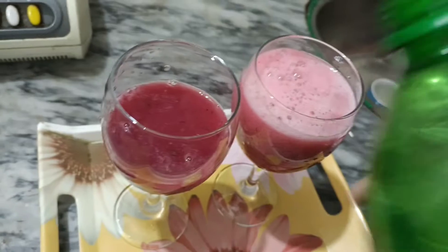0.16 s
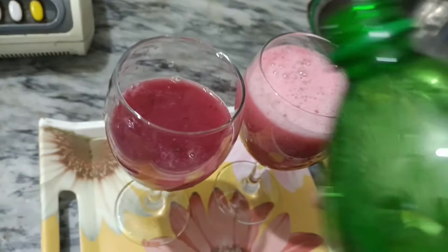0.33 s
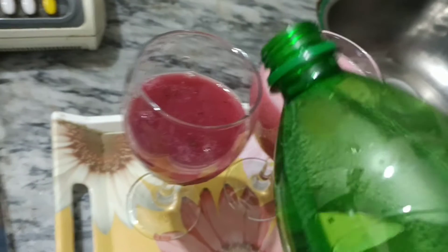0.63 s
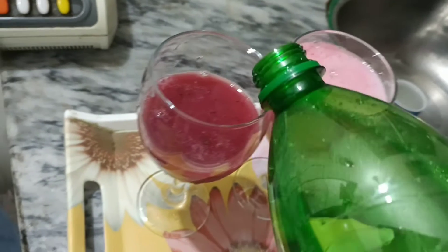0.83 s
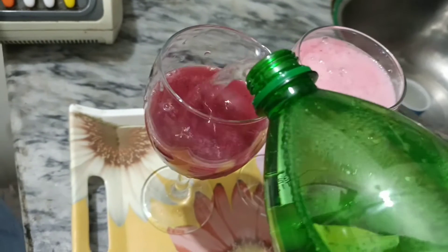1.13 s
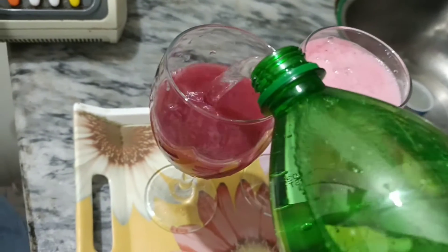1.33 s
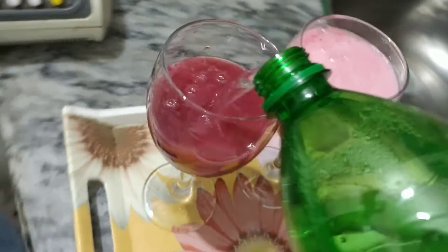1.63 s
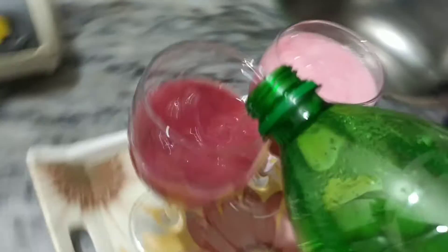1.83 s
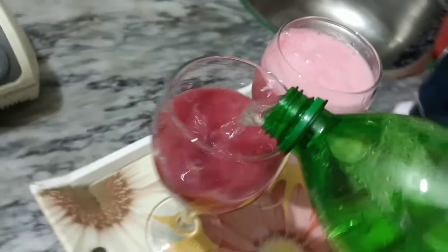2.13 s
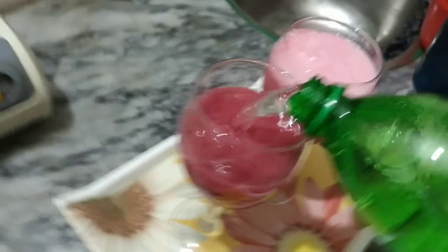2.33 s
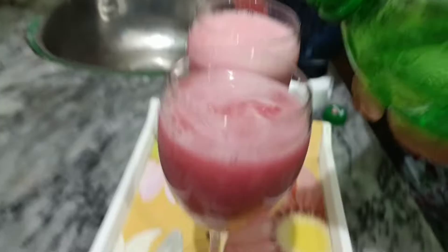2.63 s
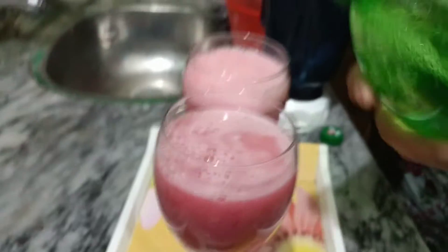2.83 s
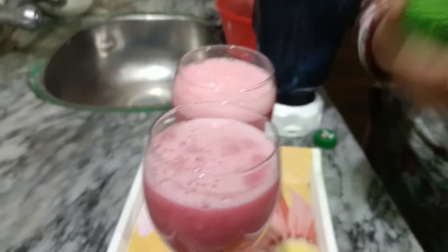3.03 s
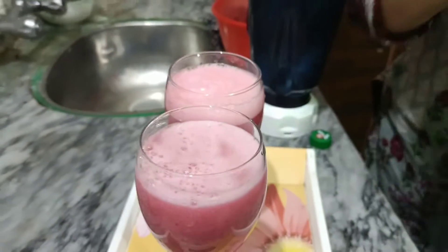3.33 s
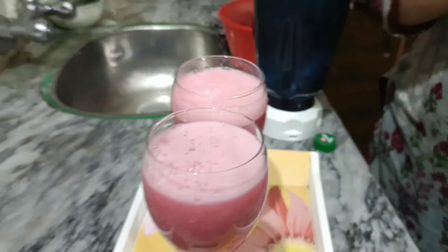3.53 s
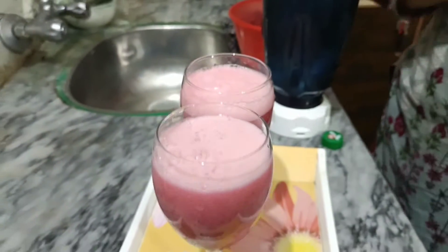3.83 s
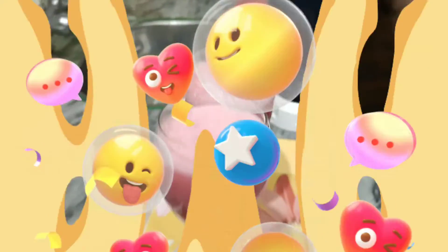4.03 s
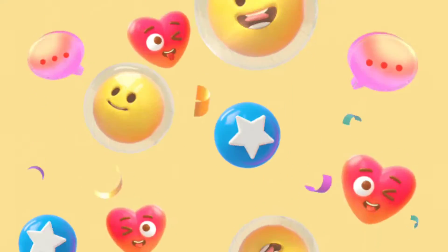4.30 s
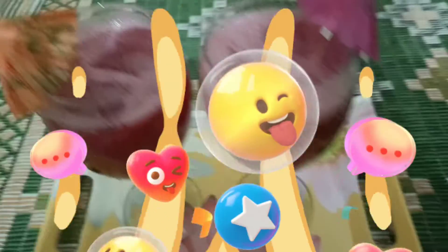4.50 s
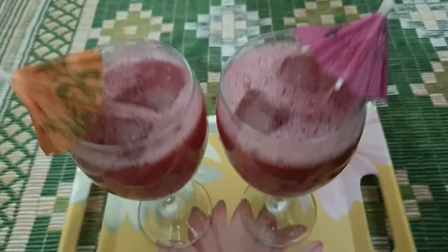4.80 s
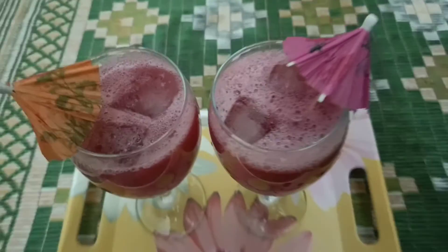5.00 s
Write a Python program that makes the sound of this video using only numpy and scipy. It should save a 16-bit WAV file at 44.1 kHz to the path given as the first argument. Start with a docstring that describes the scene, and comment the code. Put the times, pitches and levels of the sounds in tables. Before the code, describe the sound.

A large thin plastic bottle pops and crumples near the microphone as fizzy soda lands in a glass, gurgling faintly over steady hum and hiss. After pouring, fizz continues with scattered clicks and a harsh squeeze of plastic. Then a hard cut: low handling thuds, scuffing and small clicks in a different background, and finally an almost silent room.

```python
"""Soda poured into juice, in three shots

In a humming kitchen, soda from a big plastic bottle splashes and gulps into a glass of juice.
The thin wall snaps and crumples: cracks and creases ringing a panel. The fizz, filtered noise and clicks,
follows the stream of ringing air pockets; a faint hollow tone swells and fades.
After a hard cut come dull bumps, a scuff and a few sharp clicks; after a second, mostly quiet room tone.
"""
import sys
import numpy as np
from scipy import signal
from scipy.fft import rfft, irfft
from scipy.io import wavfile
from scipy.ndimage import uniform_filter1d

SR = 44100
rng = np.random.default_rng(int(sys.argv[2]) if len(sys.argv) > 2 else 0)


def materialize(psi):
    """Save the field psi as 16-bit PCM at rate SR to the path in sys.argv[1].

    A 1-D psi becomes a single channel; in a 2-D psi each row is a channel.
    """
    bounded = np.clip(np.atleast_2d(psi).T, -1, 1)
    quanta = np.round(bounded * 32767).astype(np.int16)
    wavfile.write(sys.argv[1], SR, quanta)


N = 227335
TIME = np.arange(N) / SR

# hard cuts between the three shots: (first [s], second [s])
CUTS = (3.903, 4.375)
# colour of each steady background: (frequency [Hz], relative density [dB per Hz])
KITCHEN_COLOUR = [(15, -85.5), (25, -16.5), (64, -17), (102, -4), (172, -12), (217, -11.5), (245, -3.5),
                  (278, -9), (324, -13), (1000, -20), (1300, -56.5), (2200, -120)]
BETWEEN_COLOUR = [(25, -15), (80, 8), (200, -10), (420, -11), (800, -14.5), (2000, -19.5), (3300, -18.5),
                  (4300, -27.5), (6000, -23.5), (8200, -34.5), (11000, -36), (13500, -36.5), (15200, -24)]
QUIET_COLOUR = [(25, -32), (55, -14), (88, 0), (115, -6), (145, -8.5), (250, -15.5), (450, -14),
                (750, -21.5), (2200, -23.5), (3600, -27.5), (5000, -35.5), (10500, -45.5), (13600, -48),
                (15300, -28)]
KITCHEN_DB, BETWEEN_DB, QUIET_DB = -51.5, -46, -60.5  # rms
# lines of the kitchen hum: (frequency [Hz], rms level [dB])
HUM_LINES = [(101, -60.5), (201, -65), (247.6, -50.5)]
# decay of the room tail: (frequency [Hz], time to fall 60 dB [s])
ROOM_DECAY = [(100, 0.41), (1000, 0.095), (4000, 0.31), (8000, 0.055), (15000, 0.035)]

# swells of the faint hollow tone: (peak time [s], peak level [dB])
HOOT_SWELLS = [(.505, -47.5), (.585, -40), (.79, -54.5)]
HOOT_HZ, HOOT_RISE_DB_PER_S, HOOT_FALL_DB_PER_S = 606, 156, 167

# strength of the stream hitting the drink: (time [s], strength [dB])
POUR_STRENGTH = [(0, -16), (.9, -5), (1.05, -4), (1.5, -0.5), (1.8, -2.5), (2.05, -0.5), (2.33, -0.5),
                 (2.5, -7.5), (3.9, -15)]
# colour of hiss and fizz: (frequency [Hz], relative density [dB per Hz])
FIZZ_COLOUR = [(700, -25.5), (1000, -6.5), (1400, -1.5), (1800, -3.5), (2600, 0.5), (3600, -11), (4700, -6),
               (5900, 1), (7800, -16), (10000, -6.5), (13700, -8.5), (15000, 2), (15500, 2)]
FIZZ_DB, FIZZ_FOLLOWS = -40, 0.2  # level at 0 dB stream; dB of fizz per dB of stream

# dull, low bumps: (time [s], level [dB], mid-bump pitch [Hz], length [s])
BUMPS = [(3.551, -37, 245.5, .04), (3.958, -18, 146.7, .11), (4.093, -36.5, 321.4, .06),
         (4.15, -31, 85.7, .058), (4.234, -26, 125.7, 0.12)]
# partials of a bump: (multiple of its pitch, level [dB])
BUMP_PARTIALS = [(.6, -5), (1, -2), (1.35, -9), (2.3, -18)]
BUMP_SAG = .26  # drop from start to end, as a share of the mid-bump pitch
# colour of the scuff: (frequency [Hz], relative density [dB per Hz])
SCUFF_COLOUR = [(150, -30.5), (250, 1.5), (359, 0), (474, -3.5), (837, -6.5), (1010, -11), (2020, -9.5),
                (3220, -17), (5790, -12), (8040, -19.5), (15500, -22.5)]
# light contact, then a sudden push that fades until the contact ends
TOUCH_S, PUSH_S, RELEASE_S = 3.945, 3.989, 4.08
TOUCH_DB, PUSH_DB, PUSH_RISE_DB_PER_S, PUSH_FALL_DB_PER_S = -41.5, -24, 3000, 233

# air pockets ringing in the drink, climbing in pitch as they near the surface:
# (time [s], pitch at peak [Hz], level [dB], decay time [s], pitch rise [Hz per s])
GULPS = [(1.391, 419, -43.5, .021, 400), (1.541, 1090, -42, 0.0036, 2000),
         (2.0038, 1496, -39.5, .002, 3000), (2.01, 408, -42.5, .016, 400), (2.058, 870, -43, 0.0037, 1500),
         (2.171, 1160, -28, .004, 2000), (2.176, 817, -43, 0.0061, 1500), (2.191, 1452, -43, .011, 2400),
         (2.27, 1163, -33.5, 0.005, 2700), (2.287, 1338, -37, 0.029, 3850), (2.315, 2204, -38, .03, 1760)]
SPRAY_DB = -8  # spray relative to the ring of its pocket
GURGLE, GURGLE_HZ = 0.59, 70  # depth (log gain) and rate of the flutter
SPLASH_S, SPLASH_DB, SPLASH_RISE_DB_PER_S, SPLASH_FALL_DB_PER_S = 1.004, -39.5, 4000, 330
TRICKLE_DB = -59  # at 0 dB stream

# sharp snaps, mostly of the bottle wall: (time [s], level of high ring [dB], low ring [Hz], high ring [Hz],
# low ring re high [dB], sheen re high [dB], crumpling [0-1])
SNAPS = [(0.059, -36.5, 1375, 4700, 0, -4.5, 0.3), (0.513, -31.5, 2770, 5010, -7, -14, .05),
         (0.985, -32, 1990, 4530, -28, -6, 0.3), (1.178, -35, 2670, 5500, -23, -4, .2),
         (1.217, -37, 2590, 3820, 8, -15.5, .05), (1.257, -25, 2740, 4560, -4, -20.5, 0),
         (1.459, -25, 2150, 6130, -6.5, -9, .88), (1.583, -21, 2690, 6050, -6, -9.5, 0.86),
         (1.644, -27.5, 2800, 5630, -14, -9, 0.09), (2.084, -17, 2800, 5920, -15, -18.5, 0.74),
         (2.332, -44, 2340, 6350, 2, 5, 0.43), (3.025, -41, 2250, 6050, -7.5, -18, 0.54),
         (3.423, -36, 2130, 7060, -10, 0, 0.25), (3.44, -28.5, 2980, 6400, -6.5, 6, 0.24),
         (3.459, -33, 3030, 6100, -2, -14, .4), (3.667, -50.5, 2650, 5930, 7, 16.5, 0.83),
         (3.7276, -25.5, 1980, 6330, 4, 8.5, 0.06), (3.7303, -25.5, 1894, 6300, -1.5, -20, 0.57),
         (3.946, -33.5, 3300, 5700, 1, -24, 0.72), (4.166, -35, 2820, 5500, -13, 8, 0.98),
         (4.245, -43.5, 2960, 5770, -6, -6, 0.62), (4.336, -36, 2900, 5320, -21, 7, 0.68),
         (4.951, -61, 3240, 7000, -12.5, 3, .02)]
# colour of the top octave of a snap: (frequency [Hz], relative density [dB per Hz])
SHEEN_COLOUR = [(5500, -33.5), (7500, -15), (8400, -10.5), (9800, 3), (11500, 1), (13500, -7), (15000, 2),
                (15600, 6.5)]
# a clean crack is over at once; the more it crumples, the longer the creases go on
CRACK_RISE_S, CRACK_S, CRUMPLED_CRACK_S = .0008, .0014, .006
CREASE_RISE_S, CREASE_T60_S, CRUMPLE_T60_S, CREASES_PER_S = .0069, 0.081, 0.14, 3500
REFLECTION_DELAY_S, REFLECTION_GAIN = .0007, 0.32  # middle of the delay range; gain of the close reflection
# quick pushes that squeeze the bottle: (peak time [s], peak level [dB])
SQUEEZES = [(3.868, -12.5), (3.895, -14.5)]
SQUEEZE_RISE_DB_PER_S, SQUEEZE_FALL_DB_PER_S = 1254, 804
# colour of the squeezing rasp: (frequency [Hz], relative density [dB per Hz])
RASP_COLOUR = [(350, -61), (600, -47.5), (766, -18.5), (1560, -20.5), (2340, -15), (3470, -17.5),
               (3920, -13.5), (4200, -20), (4620, -13.5), (5980, -6), (10900, -10), (12300, -19),
               (15500, -3.5)]
EDGE_HZ = 15560  # top of the final band limit


def amp(db):
    """Decibels to gain."""
    return 10 ** (np.asarray(db) / 20)


def unit(x):
    """Scales to rms 1."""
    return x / np.sqrt(np.mean(x ** 2) + 1e-20)


def sized(x, db):
    """Gives a short sound the energy of 10 ms at this rms level."""
    return amp(db) * x * np.sqrt(.01 * SR / (np.sum(x ** 2) + 1e-20))


def read(points, hz):
    """Reads a table on a log-frequency axis."""
    f, value = np.transpose(points)
    return np.interp(np.log(hz + 1), np.log(f + 1), value)


def add(mix, s, sound):
    """Mixes a sound in at a time."""
    part = mix[round(s * SR):][:len(sound)]
    part += sound[:len(part)]


def colour(x, points):
    """Shapes the spectrum with a causal, minimum-phase filter."""
    hz = abs(np.fft.fftfreq(4096, 1 / SR))
    log_gain = np.log(amp(read(points, hz)))
    taps = np.fft.ifft(np.exp(np.conj(signal.hilbert(log_gain)))).real
    return signal.fftconvolve(x, taps[:len(taps) // 2])[:len(x)]


def band(x, hz, width, order=2):
    """Band-pass around a centre; width is a share of the frequency."""
    edges = np.clip([hz / (1 + width / 2), hz * (1 + width / 2)], 10, SR / 2 - 10)
    return signal.sosfilt(signal.butter(order, edges, "band", fs=SR, output="sos"), x)


def drift(rate_hz):
    """Slow random wander of rms 1, from low-passed noise."""
    spectrum = rfft(rng.standard_normal(N))
    lowpass = np.exp(-(np.fft.rfftfreq(N, 1 / SR) / rate_hz) ** 2)
    return unit(irfft(spectrum * lowpass, N))


def clicks(size, per_s, spread_db):
    """Random clicks of both signs; the spread makes a few much larger than the rest."""
    present = rng.random(size) < per_s / SR
    sign = rng.choice([-1., 1.], size)
    return present * sign * amp(spread_db * np.minimum(rng.exponential(1, size), 4))


def swell(s, db, rise_db_per_s, fall_db_per_s):
    """Gain that climbs to a peak at s and dies away, in straight dB lines."""
    drop_db = np.maximum(rise_db_per_s * (s - TIME), fall_db_per_s * (TIME - s))
    return amp(db - drop_db.clip(0, 200))


def room(x):
    """Diffuse tail of scattered reflections, each band dying at its own speed."""
    taps = clicks(SR // 2, 4000, 0) * (np.arange(SR // 2) > .004 * SR)  # starts after 4 ms
    hz, t, bins = signal.stft(taps, SR, nperseg=256)
    fade = amp(-60 * t / read(ROOM_DECAY, hz)[:, None])
    tail = signal.istft(bins * fade, SR, nperseg=256)[1]
    return signal.fftconvolve(x, tail / np.linalg.norm(tail))[:N]


def air(points, db):
    """Steady room tone: coloured noise."""
    return amp(db) * unit(colour(rng.standard_normal(N), points))


def hum():
    """Kitchen appliance: sine lines that waver in pitch and level."""
    out = np.zeros(N)
    for hz, db in HUM_LINES:
        line = np.sin(2 * np.pi * np.cumsum(hz + 1.75 * drift(9.1)) / SR)
        out += amp(db + 0.21 * drift(6.8)) * unit(line)
    return out


def hoot():
    """A faint, broken hollow tone: a wavering line inside a fuzzy resonance."""
    angle = 2 * np.pi * np.cumsum(HOOT_HZ * (1 + 0.023 * drift(56))) / SR
    fuzz = drift(51) * np.sin(angle) + drift(46.5) * np.cos(angle)
    loudness = sum(swell(s, db, HOOT_RISE_DB_PER_S, HOOT_FALL_DB_PER_S) for s, db in HOOT_SWELLS)
    return unit(np.sin(angle) + fuzz / 2) * loudness


def pour_db():
    """Strength of the stream over time."""
    return np.interp(TIME, *np.transpose(POUR_STRENGTH))


def foam():
    """Countless tiny bursts merge with the hiss of the room, and grow with the stream."""
    grains = unit(clicks(N, 1900, spread_db=2.0)) * amp(-4.5)
    hiss = rng.standard_normal(N)
    level_db = FIZZ_DB + FIZZ_FOLLOWS * pour_db() + 0.69 * drift(20)
    return unit(colour(grains + hiss, FIZZ_COLOUR)) * amp(level_db)


def scuff():
    """Rubbing contact: dense, coloured clicks under a light touch and one sudden push."""
    touching = 1. * ((TIME > TOUCH_S) & (TIME < RELEASE_S))
    contact = uniform_filter1d(touching, size=400)  # softens the edges
    pressure = amp(TOUCH_DB) + swell(PUSH_S, PUSH_DB, PUSH_RISE_DB_PER_S, PUSH_FALL_DB_PER_S)
    return unit(colour(clicks(N, 7000, 2.3), SCUFF_COLOUR)) * contact * pressure


def thuds():
    """Low bumps swell, sag in pitch and die; the largest comes with a broad scuff."""
    out = np.zeros(N)
    for s, db, hz, length in BUMPS:
        progress = np.linspace(0, 1, int(length * SR))
        turns = np.cumsum(hz * (1 + BUMP_SAG * (.5 - progress))) / SR
        sway = sum(amp(part_db) * np.sin(2 * np.pi * multiple * turns) for multiple, part_db in BUMP_PARTIALS)
        rumble = unit(band(rng.standard_normal(SR), hz, 0.86)[-len(progress):])
        shape = signal.windows.tukey(len(progress), .6)
        add(out, s, sized((sway + 0.43 * rumble) * shape, db))
    return out + scuff()


def bubble(hz, decay, rise=0.027):
    """An air pocket rings, its pitch rising by a share per decay time as it nears the surface."""
    age = np.arange(int(8 * decay * SR)) / SR / decay
    pitch = hz * (1 + rise * (age - 1))
    return np.sin(2 * np.pi * np.cumsum(pitch) / SR) * age * np.exp(-age)


def bubbles(per_s, low_hz, high_hz, cycles):
    """A crowd of small bubbles in many sizes, each size at this rate and dying within a few cycles."""
    pitches = np.geomspace(low_hz, high_hz, num=24) * rng.uniform(.97, 1.03, 24)
    crowd = np.zeros(N)
    for hz in pitches:
        crowd += signal.fftconvolve(clicks(N, per_s, spread_db=3.0), bubble(hz, cycles / hz))[:N]
    return unit(crowd)


def gulp(hz, db, decay, rise_hz_per_s):
    """A pocket rings and throws noise spray; the sloshing surface makes a long ring flutter."""
    ring = bubble(hz, decay, rise_hz_per_s * decay / hz)
    ring = ring * np.exp(GURGLE * drift(GURGLE_HZ)[:len(ring)])
    envelope = abs(signal.hilbert(ring))
    spray = band(rng.standard_normal(len(ring)) * envelope, hz, 0.37)
    return sized(unit(ring) + amp(SPRAY_DB) * unit(spray), db)


def stream():
    """A landing splash of many bubbles and single gulps, over a trickle of small bubbles."""
    out = np.zeros(N)
    for s, *pocket in GULPS:
        add(out, s, gulp(*pocket))
    splash = bubbles(per_s=150, low_hz=624, high_hz=1840, cycles=4)
    splash *= swell(SPLASH_S, SPLASH_DB, SPLASH_RISE_DB_PER_S, SPLASH_FALL_DB_PER_S)
    trickle = bubbles(per_s=18, low_hz=360.4, high_hz=2800, cycles=3.45) * amp(TRICKLE_DB + pour_db())
    return out + splash + trickle


def reflect(x, delay, gain):
    """A surface close by returns the sound at once and combs its spectrum."""
    return x + gain * np.r_[np.zeros(int(delay * SR)), x][:len(x)]


def panel(x, ring, t60, count=26):
    """A thin panel rings in many short modes, drawn afresh at each call."""
    t = np.arange(SR // 16) / SR
    place, phase, size = rng.random((count, 3)).T[:, :, None]
    hz = 1800 * 7 ** place
    modes = (size * np.sin(2 * np.pi * (hz * t + phase))).sum(0) * amp(-60 * t / t60)
    return unit(x) + ring * unit(signal.fftconvolve(x, modes)[:len(x)])


def snap(db, low_hz, high_hz, low_db, sheen_db, crumple):
    """A sharp crack, with small creases in its wake as it crumples; both ring a thin panel."""
    t = np.arange(SR // 4) / SR
    tearing = (1 - np.exp(-t / CRACK_RISE_S)) * np.exp(-t / (CRACK_S + CRUMPLED_CRACK_S * crumple))
    crack = (t == 0) + 0.36 * rng.standard_normal(len(t)) * tearing
    t60 = CREASE_T60_S + CRUMPLE_T60_S * crumple
    creases = clicks(len(t), CREASES_PER_S, spread_db=3.2)
    creases = creases * amp(-60 * t / t60) * (1 - np.exp(-t / CREASE_RISE_S))
    drive = np.sqrt(1 - crumple) * unit(crack) + np.sqrt(crumple) * unit(creases)
    # each snap draws its own short delay for the close reflection
    delay = REFLECTION_DELAY_S * rng.uniform(.5, 1.5)
    drive = reflect(panel(drive, ring=0.53, t60=0.023), delay, REFLECTION_GAIN)
    # each of the two main rings stands on a broad shoulder
    low = unit(band(band(drive, low_hz, 0.065, order=1), low_hz, 0.56))
    low = low + amp(-2.5) * unit(band(drive, 2420, 0.62))
    high = unit(band(band(drive, high_hz, 0.42, order=1), high_hz, 0.28))
    high = high + amp(-8.0) * unit(band(drive, 5260, 0.64, order=4))
    sheen = colour(drive, SHEEN_COLOUR)
    return sized(high, db) + sized(low, db + low_db) + sized(sheen, db + sheen_db)


def rasp():
    """The squeezed bottle: crowded creases ring the wall in two pushes, cut short at the first cut."""
    creases = panel(clicks(N, 3700, 1.0), ring=0.62, t60=0.014)
    grip = sum(swell(s, db, SQUEEZE_RISE_DB_PER_S, SQUEEZE_FALL_DB_PER_S) for s, db in SQUEEZES)
    return unit(colour(creases, RASP_COLOUR)) * grip * (TIME < CUTS[0])


def snaps_and_rasp():
    """All the sharp snaps, mostly of the bottle wall, and a crowded rasp before the first cut."""
    out = np.zeros(N)
    for s, *shape in SNAPS:
        add(out, s, snap(*shape))
    return out + rasp()


def scene():
    """Three shots joined by hard cuts, each with its own background; no room tail crosses a cut."""
    snaps, drink, bumps = snaps_and_rasp(), stream(), thuds()
    first, last = TIME < CUTS[0], TIME >= CUTS[1]
    backgrounds = [(first, air(KITCHEN_COLOUR, KITCHEN_DB) + hum() + foam() + hoot()),
                   (~first & ~last, air(BETWEEN_COLOUR, BETWEEN_DB)),
                   (last, air(QUIET_COLOUR, QUIET_DB))]
    # a quarter second of mute keeps what still rings at the second cut out of the quiet room
    kept = ~last | (TIME > CUTS[1] + .25)
    direct = kept * (snaps + drink + bumps)
    echoing = kept * (amp(-18.0) * snaps + amp(-5.0) * drink + amp(-19.5) * bumps)
    return sum(shot * (floor + direct + room(echoing * shot)) for shot, floor in backgrounds)[None]


def record(dry):
    """Band limit: a steep low-pass takes off the extreme top."""
    lowpass = signal.firwin(511, EDGE_HZ, window=("kaiser", 9), fs=SR)
    return signal.oaconvolve(dry, lowpass[None], "same")


dry = scene()
out = record(dry)
materialize(out)
```